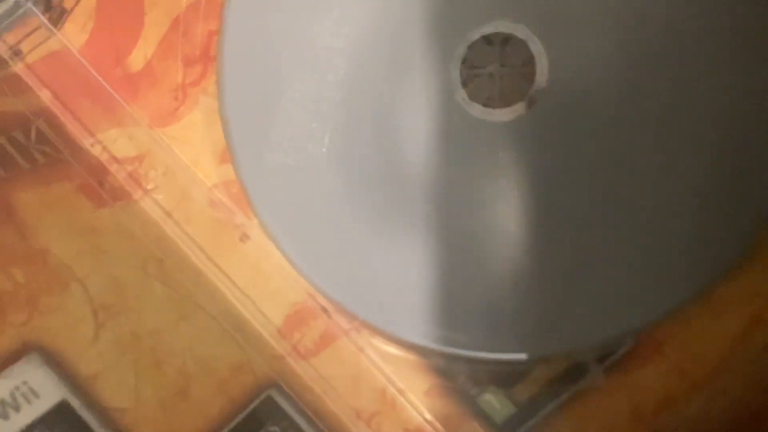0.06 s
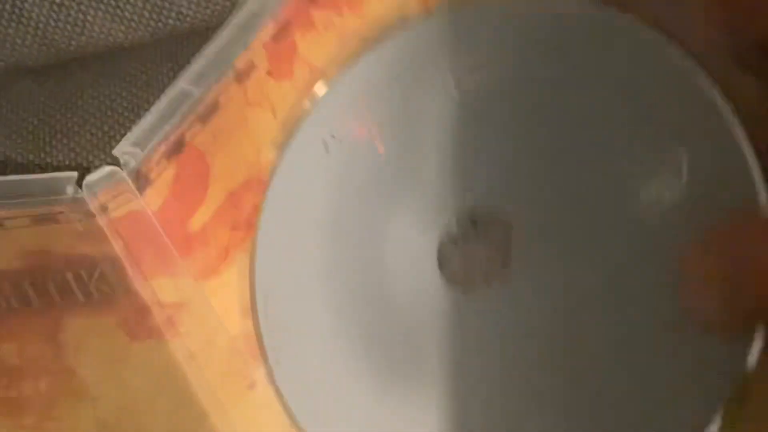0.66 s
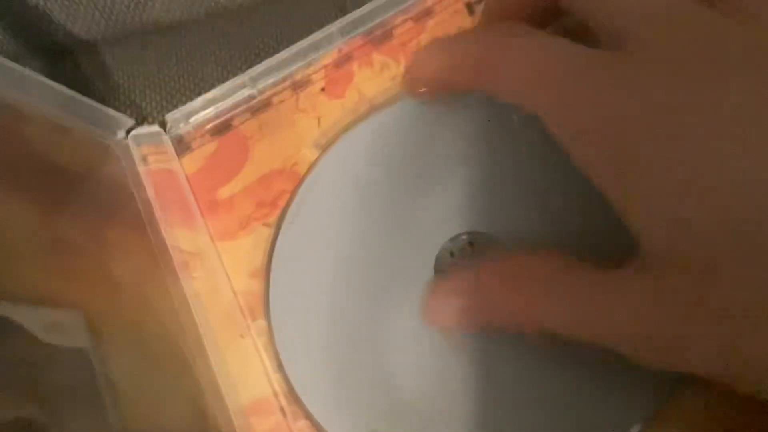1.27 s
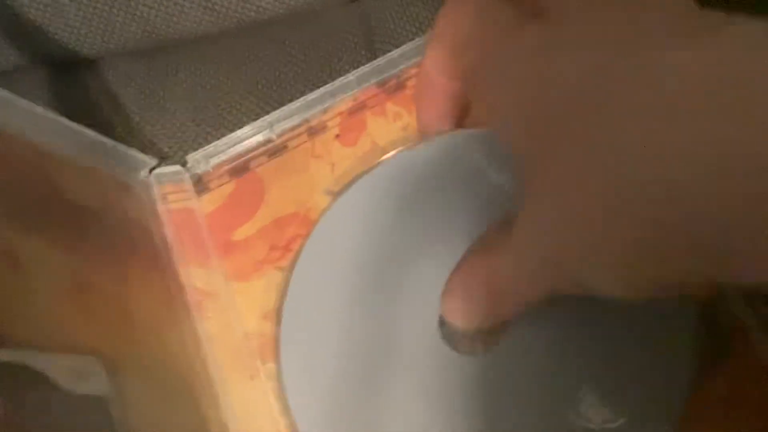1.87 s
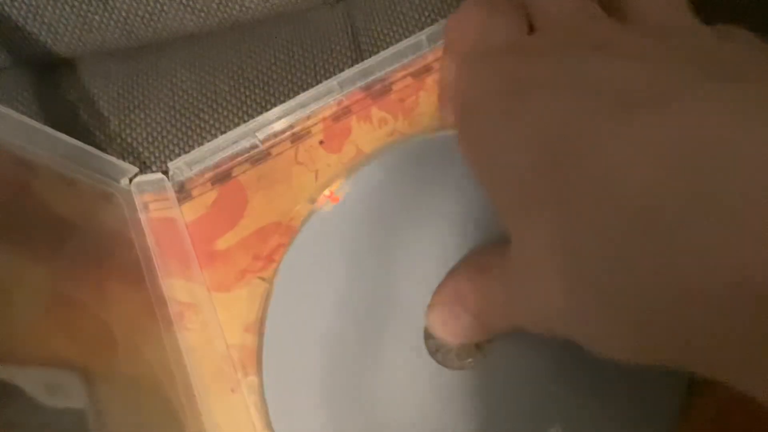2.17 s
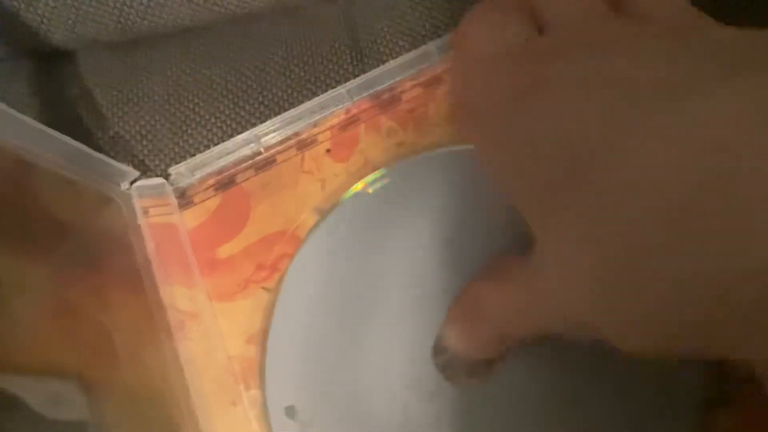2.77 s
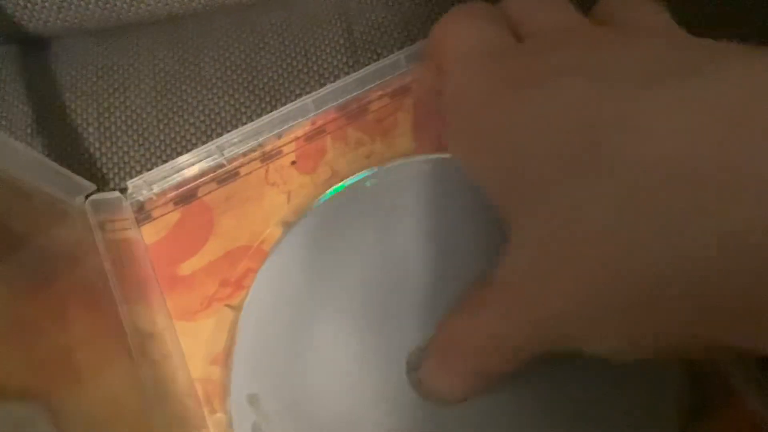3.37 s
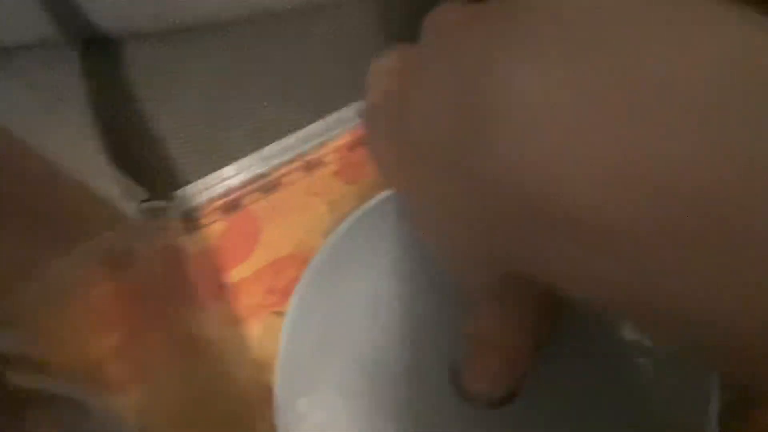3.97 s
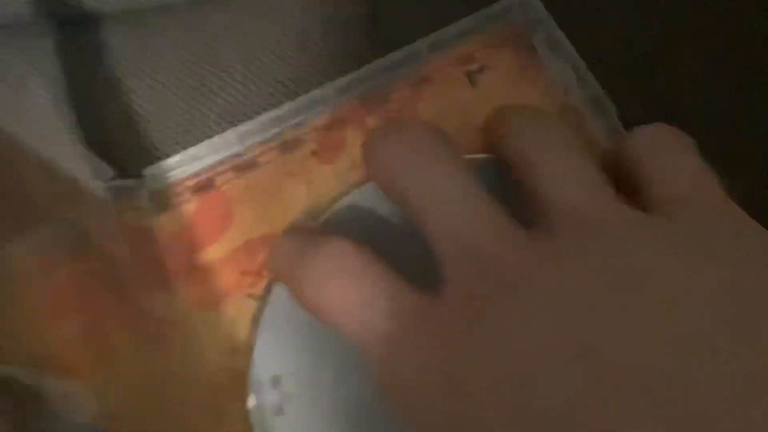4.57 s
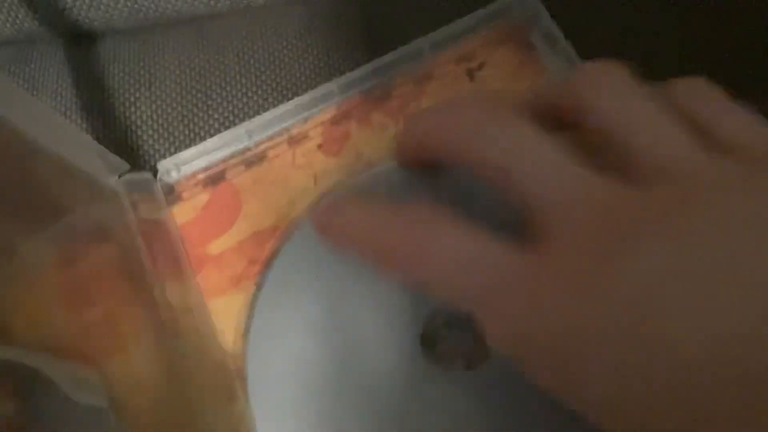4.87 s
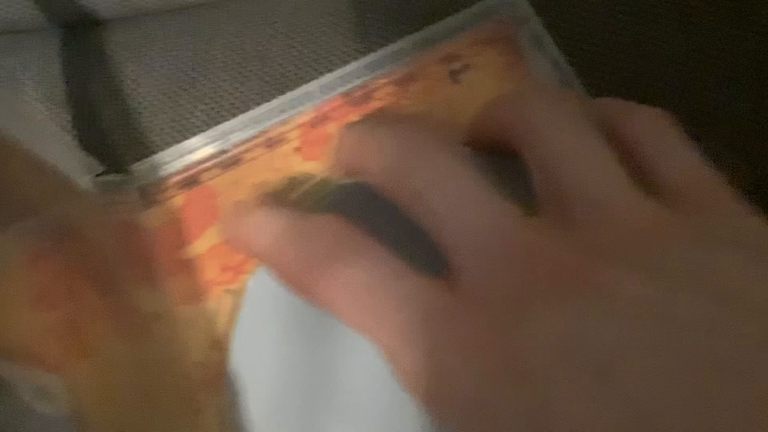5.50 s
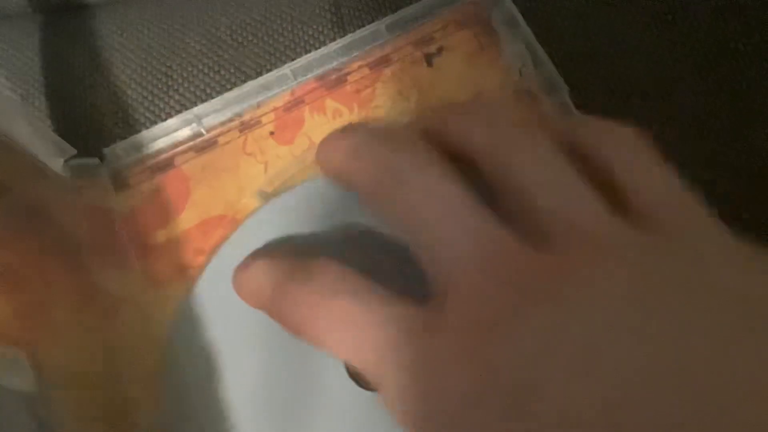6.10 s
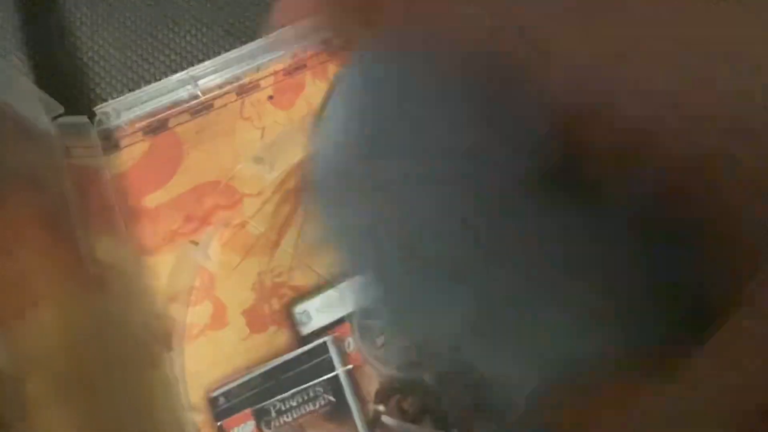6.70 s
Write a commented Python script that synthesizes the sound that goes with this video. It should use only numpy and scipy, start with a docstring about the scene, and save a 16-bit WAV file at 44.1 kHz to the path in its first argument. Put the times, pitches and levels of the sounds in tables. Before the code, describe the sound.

Plastic clicks and scrapes unevenly as fingers shift a disc and press it onto the hub of its case. Light ticks and brief creaks lead to two sharp snaps, more quiet rubbing, and then a loud crack that shoves the case with a low thump. Clicks crowd together afterwards, ending in a last few snaps and fading ticks. It is all heard close up in a quiet, small room.

```python
"""A small room, close up: a hand slides a disc about in an open plastic case and presses it on the hub.
Fingers and disc rub with a grainy hiss over the rumble of the held case. Stick-slip makes short creaks.
Hard contacts of disc, hub and case click, snap and ring the plastic; one snap shoves the case: a dull thump.
The microphone delivers low notes late, so every click ends in a tiny downward chirp."""
import sys
import numpy as np
from scipy import signal
from scipy.fft import rfft, irfft, next_fast_len
from scipy.io import wavfile

SR = 44100
rng = np.random.default_rng(int(sys.argv[2]) if len(sys.argv) > 2 else 0)


def store_pcm(level_fs):
    """Save levels as 16-bit WAV."""
    pcm = np.round(np.clip(level_fs, -1, 1) * 32767).astype(np.int16)
    wavfile.write(sys.argv[1], SR, np.atleast_2d(pcm).T)


N = 297454
TIME_S = np.arange(N) / SR

# Spectral shapes of still air, friction, its treble, case rumble: freq_hz, density_db
AIR_SPECTRUM = [(20, -25.5), (110, 1), (260, -12), (600, -2.5), (2000, -18.5), (5500, -18), (7000, -21.5),
                (16000, -21.5)]
FRICTION_SPECTRUM = [(200, -12.5), (400, -3), (700, 2.5), (1100, 0.5), (1800, 0), (2600, 0), (3600, -6.5),
                     (5600, -6.5), (6600, -26.5), (9000, -43.5)]
TREBLE_SPECTRUM = [(4500, -19), (6500, 0), (8000, 0.5), (11000, -2.5), (14500, -2), (17000, -7.5)]
RUMBLE_SPECTRUM = [(20, -39), (42, -20), (70, 12), (110, 8), (180, -0.5), (280, 3.5), (420, -3.5),
                   (900, -43.5)]
# How hard the hand works the case: time_s, level_db
HAND_EFFORT = [(0.0, -75.5), (0.52, -77), (1.12, -57), (1.43, -61.5), (1.9, -65), (2.07, -73), (2.31, -74),
               (2.5, -68), (2.95, -67), (3.34, -69), (3.64, -61), (4.56, -62.5), (4.9, -44), (5.22, -72),
               (5.89, -56), (6.2, -68), (6.4, -74.5), (6.74, -78)]
# Strokes of fingers and disc: start_s, end_s, friction_db, treble_rel_db, rumble_db
RUB_STROKES = [(0.123, 0.22, -57, -28, -87), (0.204, 0.34, -57.5, -13, -85),
               (0.466, 0.658, -58.5, -11.5, -76), (0.73, 0.787, -57, -19.5, -80),
               (0.833, 0.974, -50.5, -16, -52.5), (0.993, 1.186, -55.5, -27, -51),
               (1.27, 1.306, -49.5, -23, -52), (1.397, 1.475, -55.5, -13.5, -59),
               (1.48, 1.68, -61, -9.5, -66), (1.718, 1.78, -59, -12, -58.5), (1.847, 1.925, -67, -9, -65),
               (1.946, 2.086, -54.5, -8.5, -67), (2.163, 2.226, -69, -21, -76),
               (2.298, 2.37, -72, -5.5, -64), (2.413, 2.546, -67, -11, -57.5),
               (2.548, 2.59, -62, -29.5, -57.5), (2.643, 2.698, -63, -30, -60.5),
               (2.796, 2.88, -58.5, -15, -60.5), (2.96, 3.059, -57.5, -7, -56.5),
               (3.102, 3.145, -61, -14.5, -57), (3.401, 3.577, -56, -16.5, -55),
               (3.628, 3.79, -64.5, -22, -57), (3.793, 3.884, -62.5, -27.5, -60.5),
               (3.928, 3.974, -43.5, -6.5, -46.5), (4.0, 4.102, -55.5, -14.5, -68),
               (4.23, 4.293, -54, -22, -55), (4.383, 4.53, -60.5, -23, -59.5),
               (4.65, 5.077, -55.5, -24, -47), (5.125, 5.18, -59.5, -8, -70), (5.44, 5.6, -62.5, -20, -56),
               (5.605, 5.658, -58.5, -13, -63), (5.716, 5.814, -58.5, -11, -54),
               (5.857, 5.958, -58.5, -32, -53), (5.996, 6.136, -63.5, -16, -53.5),
               (6.193, 6.25, -56, -7, -51.5), (6.278, 6.322, -57.5, -30, -60.5),
               (6.372, 6.418, -64, -18.5, -65)]
# Stick-slip of the disc edge: start_s, end_s, level_db, treble_rel_db, spot_hz
EDGE_SCRAPES = [(0.194, 0.245, -46, -18, 2480), (0.296, .35, -59, -18, 2420),
                (0.802, .95, -55.5, -14, 1450), (1.064, 1.1, -39.5, -20, 2780),
                (1.689, 1.729, -45.5, -6.5, 1060), (2.305, 2.349, -57.5, -5.5, 5320),
                (2.954, 3.015, -57, 2, 3040), (3.527, 3.531, -40, -15, 2470), (3.599, 3.62, -48, -24, 616),
                (3.914, 3.924, -26, -16, 1750), (4.648, 4.673, -44, -18, 2390),
                (4.772, 4.789, -43.5, -14.5, 3020), (4.835, 4.854, -38, -15, 2980),
                (4.933, 4.945, -41, -22.5, 2000), (4.978, 5.002, -41.5, -10, 2530),
                (5.022, 5.064, -49.5, -33, 2000), (5.409, 5.423, -43, -30.5, 2700),
                (6.184, 6.225, -35, -12, 3500)]
# Resonances of case and disc: freq_hz, width_hz, gain_db
PLASTIC_MODES = [(244, 160, 10.5), (646, 220, 6.5), (925, 260, 0.5), (1786, 1500, 5), (2970, 270, 3.5),
                 (4036, 370, -4.5), (5037, 370, 3), (5670, 650, 3), (8870, 50, -4.5), (10740, 790, -4),
                 (12540, 290, -1.5), (14700, 560, 2.5)]
# Contacts of disc, hub and case: start_s, snap_energy_db, thud_rel_db, tick_rel_db, rattle_t60_s, spot_hz
HARD_CONTACTS = [(0.2, -18, -15.5, -32, 0.15, 2500), (0.228, -13, -45, -28, 0.11, 2480),
                 (0.5389, -27.5, 0.5, -24, 0.051, 1580), (1.0008, -16.5, -8.5, -25, 0.023, 2640),
                 (1.053, -24.5, 4, -21, .023, 610), (1.0672, -11, 1.5, -17, 0.05, 950),
                 (1.0892, 2.5, -12.5, -11.5, .021, 2720), (1.096, -1.5, -4.5, -16, 0.023, 2360),
                 (1.144, -23.5, 5, -7, 0.025, 755), (1.1822, -20, 1.5, -13, 0.014, 690),
                 (1.256, -30, 18, -8, 0.049, 590), (1.2868, -10, -8, -18, 0.014, 2320),
                 (1.4417, -31, 8, -7, .0071, 544), (1.6989, -17.5, 1, -8, 0.081, 1240),
                 (1.7191, -11, 4, -14, 0.013, 585), (1.891, -24, 5.5, -13, 0.044, 930),
                 (1.9605, 13.5, -13.5, -11, 0.014, 1890), (1.9927, 6, -7, -4, 0.012, 1790),
                 (2.4081, -17.5, 6.5, -29, 0.022, 2050), (2.4332, -8, -1.5, -7.5, 0.0014, 5720),
                 (2.5543, -20, -2, -36, 0.0086, 2080), (2.5782, -24, -2, -37.5, 0.0019, 950),
                 (2.793, -10.5, 2, -16.5, 0.023, 614), (2.8919, -17, 2, -20, 0.012, 880),
                 (2.9371, -14.5, 6, -16, 0.0079, 620), (2.9716, -19.5, 5, -23, 0.012, 597),
                 (3.0405, -26.5, -15, -1.5, 0.0058, 3280), (3.1192, -25.5, 2, -16, .023, 2020),
                 (3.4396, -29, 8.5, -23, 0.013, 664), (3.5357, -12, -8.5, -24, 0.031, 2430),
                 (3.5929, -21.5, 6, -24, 0.091, 560), (3.633, -25, 1.5, -23, 0.019, 940),
                 (3.6879, -25.5, 2, -34.5, .002, 1210), (3.7384, -36, 15, -16.5, 0.016, 1025),
                 (3.8979, -19, 4.5, -8, 0.036, 2920), (3.9242, 11.5, -15, -12, 0.0085, 2090),
                 (4.0743, -16, -3, -33, 0.0082, 1900), (4.1175, -14.5, -8.5, -46, .006, 2000),
                 (4.177, -24.5, 1.5, -32, 0.074, 596), (4.264, -13.5, 1, -15, 0.033, 626),
                 (4.3274, -31, 6.5, -26, 0.029, 2070), (4.351, -17.5, 5.5, -4.5, 0.025, 2200),
                 (4.359, -14, -1.5, -20, 0.064, 2250), (4.4483, -28, -12.5, -32, 0.014, 5300),
                 (4.5311, -34.5, 10.5, -17.5, 0.069, 546), (4.6558, -4, -8.5, -21, 0.0088, 3020),
                 (4.6845, -16.5, -2, -22.5, 0.03, 3140), (4.713, -18, -26, -12, 0.025, 3200),
                 (4.7416, -17, -17, -12, 0.0042, 2340), (4.7584, -15.5, -3.5, -21, 0.039, 600),
                 (4.8074, -17.5, -17, -28, 0.016, 3130), (4.835, -9, -0.5, -22, 0.024, 615),
                 (4.8479, -8, -1, -19, 0.051, 2750), (4.8564, -7, -2.5, -19, 0.0084, 3280),
                 (4.8856, -10, -12, -13, 0.018, 1520), (4.908, 1.5, -8.5, -7.5, 0.016, 2030),
                 (4.9637, -12.5, 1, -15, 0.013, 1530), (4.9863, -22, 7, -11, 0.0058, 1660),
                 (4.9934, -7, 2.5, -5.5, 0.011, 1590), (5.0005, -8, -1.5, -29, 0.023, 1600),
                 (5.0275, -18.5, -3, -33, 0.04, 2050), (5.0837, -14, -0.5, -12, .032, 1980),
                 (5.29, -28, -1, -15.5, 0.086, 2830), (5.4173, -9.5, -2.5, -33, 0.0051, 2120),
                 (5.4738, -26, -3, -23, 0.015, 3820), (5.512, -21.5, -2, -3, 0.043, 1490),
                 (5.552, -29.5, 14, -13.5, .01, 620), (5.558, -23.5, 3, -28, 0.025, 790),
                 (5.644, -15, -9, -2, .003, 1100), (5.7122, -15, -10, -19, .023, 3660),
                 (5.7257, -19.5, 9.5, -22, 0.038, 634), (5.7541, -26.5, 22.5, -14, 0.055, 620),
                 (5.7612, -7, 4, -16.5, 0.014, 830), (5.786, -11, 4, -14, 0.028, 630),
                 (5.869, -9, -9.5, -15, 0.025, 3920), (5.8885, -16, -22, -20, 0.018, 2160),
                 (5.924, -23, 7, -33, 0.044, 2990), (5.9889, -19.5, 1, -13, 0.011, 2280),
                 (6.0395, -10.5, -7, -22, 0.058, 2120), (6.0627, 3.5, -14, -12, 0.03, 2180),
                 (6.0956, -10, -11.5, -40, 0.024, 1650), (6.1754, -9, -11, -21.5, 0.1, 3300),
                 (6.2114, 4.5, -10, -5.5, 0.017, 3700), (6.3035, -23.5, -5, -22, 0.017, 2280),
                 (6.3876, -26, -2.5, -23, 0.054, 1000), (6.593, -37, 3.5, 3, 0.049, 4260)]
# Thud, knock, snap and tick bands of a click: low_hz, high_hz
CLICK_BANDS = [(135, 445), (450, 1533), (1400, 5360), (6000, 14900)]
# Bumps of fingers, and of the case on its support: start_s, level_db, pitch_hz, t60_s
SOFT_BUMPS = [(0.649, -46.5, 150, 0.041), (0.835, -52, 121.5, .06), (1.009, -46, 200, .03),
              (1.117, -40, 70, 0.055), (1.29, -44, 80.5, 0.053), (1.604, -44.5, 98, 0.083),
              (1.683, -32, 166, 0.03), (2.522, -33, 210, 0.04), (2.628, -33.5, 105.8, 0.052),
              (2.689, -35.5, 230, 0.022), (3.058, -41, 180, 0.031), (3.443, -44, 114, 0.065),
              (3.526, -40, 107, .05), (3.633, -36, 163, 0.07), (3.742, -43.5, 185, .04),
              (3.923, -5, 83, 0.062), (3.924, -13, 125, 0.05), (5.553, -36.5, 121, 0.15),
              (5.793, -29.5, 138, 0.044), (6.104, -45, 107, 0.044), (6.213, -17, 196, 0.031)]
# Room tail strength: freq_hz, band_gain_db
ROOM_GAINS = [(120, -15), (300, -21), (700, -17.5), (1400, -21), (2600, -17.5), (5000, -20.5), (9000, -19),
              (15000, -23.5)]
# Room tail decay: freq_hz, t60_s
ROOM_DECAYS = [(120, .28), (1400, .29), (2600, .32), (5000, .3), (9000, .25), (15000, .21)]


def from_db(db):
    return 10 ** (np.asarray(db) / 20)


def unit_rms(x):
    return x / np.sqrt(np.mean(x ** 2) + 1e-20)


def at_hz(table, hz):
    """Table lookup on a log-frequency axis."""
    table = np.array(table)
    return np.interp(np.log(hz + 1e-9), np.log(table[:, 0]), table[:, 1])


def coloured(x, spectrum):
    """x filtered by a spectral shape; rms 1."""
    size = next_fast_len(N)
    hz = np.arange(size // 2 + 1) * SR / size
    return unit_rms(irfft(rfft(x, size) * from_db(at_hz(spectrum, hz)), size)[:N])


def band(x, low_hz, high_hz, order=2):
    return signal.sosfilt(signal.butter(order, [low_hz, high_hz], "band", fs=SR, output="sos"), x)


def resonance(x, hz, width_hz):
    """Damped mode, peak gain 1."""
    radius = np.exp(-np.pi * width_hz / SR)
    feedback = [1, -2 * radius * np.cos(2 * np.pi * hz / SR), radius ** 2]
    return (1 - radius ** 2) / 2 * signal.lfilter([1, 0, -1], feedback, x + 1e-18)


def add(out, start_s, sound):
    i = round(start_s * SR)
    out[i:i + len(sound)] += sound[:N - i]


def wander(per_s):
    """Random curve, per_s new values a second."""
    steps = rng.standard_normal(1000)
    return np.interp(TIME_S * per_s, np.arange(len(steps)), steps)


def air(level_db=-81):
    """Still air: faint steady noise."""
    return from_db(level_db) * coloured(rng.standard_normal(N), AIR_SPECTRUM)


def effort_db(time_s):
    return np.interp(time_s, *np.transpose(HAND_EFFORT))


def rub_gains(arch_db=3, rise_db_per_s=379.5, fall_db_per_s=319.5, resting_rel_db=(-7.5, -23.5, -3)):
    """Friction, treble and rumble gains: each stroke peaks half way; resting fingers set the floor."""
    levels_db = effort_db(TIME_S) + np.array(resting_rel_db)[:, None]
    for start_s, end_s, friction_db, treble_rel_db, rumble_db in RUB_STROKES:
        peak_db = np.array([[friction_db], [friction_db + treble_rel_db], [rumble_db]])
        off_centre = np.clip(2 * (TIME_S - start_s) / (end_s - start_s) - 1, -1, 1)
        before_db = rise_db_per_s * np.maximum(start_s - TIME_S, 0)
        after_db = fall_db_per_s * np.maximum(TIME_S - end_s, 0)
        levels_db = np.maximum(levels_db, peak_db - arch_db * off_centre ** 2 - before_db - after_db)
    return from_db(levels_db)


def slips(per_s, spread_db):
    """Tiny slips at random times, very uneven in size; rms 1."""
    sizes = from_db(spread_db * np.minimum(rng.exponential(1, N), 4))
    return unit_rms((rng.random(N) < per_s / SR) * sizes * rng.choice([-1, 1], N))


def moving_contact(force, depth_db, per_s, bands=30):
    """As the contact wanders, each band swells and fades on its own."""
    edges_hz = np.append(40, np.geomspace(150, 17000, bands))
    return sum((-1) ** k * band(force, *edges_hz[k:k + 2]) * from_db(depth_db * wander(per_s))
               for k in range(bands))


def sliding(grain=0.4, scuff_db=3.5):
    """Skin and disc rub in uneven, grainy scuffs; the held case rumbles."""
    friction, treble, rumble = rub_gains()
    grip = from_db(scuff_db * wander(per_s=77))
    force = grip * (rng.standard_normal(N) + grain * slips(per_s=700, spread_db=4.5))
    force = moving_contact(force, depth_db=3.5, per_s=26)
    return (friction * coloured(force, FRICTION_SPECTRUM)
            + treble * coloured(force, TREBLE_SPECTRUM)
            + rumble * coloured(force, RUMBLE_SPECTRUM))


def taps(count=45, above_effort_db=22, thud_rel_db=9, tick_rel_db=-18.5, t60_s=0.015, centre_hz=750):
    """Faint, dull random taps of the loose disc, following hand effort; rows as in HARD_CONTACTS."""
    start_s = (np.arange(count) + rng.random(count)) / count * N / SR
    scatter_db, detune = rng.standard_normal((2, count))
    snap_db = effort_db(start_s) + above_effort_db + scatter_db
    spot_hz = centre_hz * 2 ** (detune / 2)
    columns = np.broadcast_arrays(start_s, snap_db, thud_rel_db, tick_rel_db, t60_s, spot_hz)
    return np.column_stack(columns)


def case_ring(force, offsets_db):
    """Direct contact sound plus the modes it excites."""
    return force + sum(from_db(gain_db + offset_db) * resonance(force, hz, width_hz)
                       for (hz, width_hz, gain_db), offset_db in zip(PLASTIC_MODES, offsets_db))


def scrapes(ramp_s=0.0054, hiss=0.6, spot_db=7, spot_q=9):
    """The disc edge drags over plastic: dense slips ring the case and the rubbed spot."""
    force = slips(per_s=1800, spread_db=3) + hiss * rng.standard_normal(N)
    body = coloured(case_ring(force, np.zeros(len(PLASTIC_MODES))), FRICTION_SPECTRUM)
    treble = coloured(force, TREBLE_SPECTRUM)
    out = np.zeros(N)
    for start_s, end_s, level_db, treble_rel_db, spot_hz in EDGE_SCRAPES:
        gate = np.clip(np.minimum(TIME_S - start_s, end_s - TIME_S) / ramp_s + 0.5, 0, 1)
        creak = unit_rms(body + from_db(spot_db) * resonance(body, spot_hz, spot_hz / spot_q))
        out += from_db(level_db) * gate * (creak + from_db(treble_rel_db) * treble)
    return out


def struck_spot(force, hz, gain=1.35, q=8.5):
    """The hand damps the struck spot: a broad, weak note."""
    return force + gain * resonance(force, hz, hz / q)


def clicks(rattle=0.39, rise_s=0.00071, mode_spread_db=1.0, size=3000):
    """One hard contact plus a dying rattle of micro-contacts; where it lands sets the colour."""
    start_s, snap_db, thud_rel_db, tick_rel_db, t60_s, spot_hz = np.vstack([HARD_CONTACTS, taps()]).T
    knock_rel_db = 0.75 * thud_rel_db - 1  # partly follows the thud
    t = TIME_S[:size]
    draws = rng.standard_normal((len(start_s), size + len(PLASTIC_MODES)))
    noise, mode_scatter = draws[:, :size], draws[:, size:]
    micro_contacts = noise * np.abs(noise)  # few large, many small
    decay = from_db(-60 * t / np.maximum(t60_s, 0.002)[:, None])
    force = rattle * micro_contacts * decay * (1 - np.exp(-t / rise_s))
    force[:, round(rise_s * SR)] += 1  # the hard contact
    struck = np.array([struck_spot(row, hz) for row, hz in zip(force, spot_hz)])
    ringing = case_ring(struck, mode_spread_db * mode_scatter.T[:, :, None])
    sounds = 0
    for k, rel_db in enumerate([thud_rel_db, knock_rel_db, 0, tick_rel_db]):
        part = band(ringing, *CLICK_BANDS[k], order=3)
        gain = from_db(snap_db + rel_db) / np.linalg.norm(part, axis=1)
        sounds = sounds + (-1) ** k * gain[:, None] * part
    out = np.zeros(N)
    for onset_s, sound in zip(start_s, sounds):
        add(out, onset_s, sound)
    return out


def thumps(contact_s=0.0027):
    """A soft push bounces the whole case for a few slow cycles."""
    out, t = np.zeros(N), TIME_S[:SR // 2]
    for start_s, level_db, pitch_hz, t60_s in SOFT_BUMPS:
        envelope = from_db(level_db - 60 * t / t60_s) * (1 - np.exp(-t / contact_s))
        add(out, start_s, envelope * np.sin(2 * np.pi * pitch_hz * t))
    return out


def room(x, build_s=0.0012, size=22050):
    """Diffuse tail: quick build-up, a decay time per band."""
    t, tail = TIME_S[:size], 0
    build_up = 1 - np.exp(-(t / build_s) ** 2)
    edges_hz = np.geomspace(90, 17000, 14)
    for low_hz, high_hz in zip(edges_hz, edges_hz[1:]):
        centre_hz = np.sqrt(low_hz * high_hz)
        envelope = build_up * from_db(-60 * t / at_hz(ROOM_DECAYS, centre_hz))
        noise = band(rng.standard_normal(size), low_hz, high_hz)
        tail = tail + from_db(at_hz(ROOM_GAINS, centre_hz)) * noise * envelope / np.linalg.norm(envelope)
    return signal.fftconvolve(x, tail)[:N]


def scene():
    """Handling noise with its room tail, dry thumps, still air; mono."""
    handling = clicks() + scrapes() + sliding()
    return (air() + handling + room(handling) + thumps())[None]


def record(dry, lag_hz=180, allpasses=8, low_cut_hz=42, high_cut_hz=16100, ceiling=1.1):
    """Microphone: allpasses delay the bass; then low cut, rounded peaks, high cut."""
    pole = np.exp(-2 * np.pi * lag_hz / SR)
    lagged = dry
    for _ in range(allpasses):
        lagged = signal.lfilter([-pole, 1], [1, -pole], lagged)
    low_cut = signal.butter(2, low_cut_hz, "high", fs=SR, output="sos")
    high_cut = signal.ellip(10, 0.2, 70, high_cut_hz, fs=SR, output="sos")
    rounded = ceiling * np.tanh(signal.sosfilt(low_cut, lagged) / ceiling)
    return signal.sosfilt(high_cut, rounded)


dry = scene()
out = record(dry)
store_pcm(out)
```